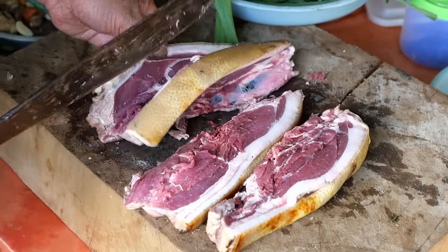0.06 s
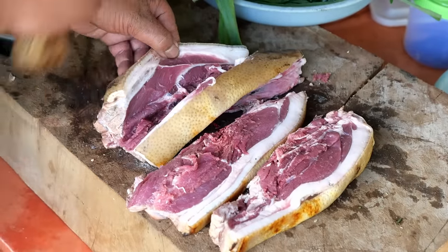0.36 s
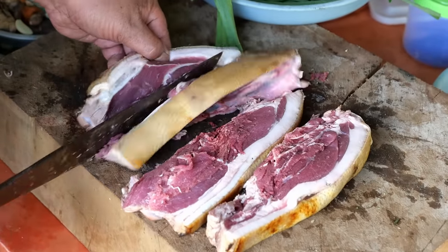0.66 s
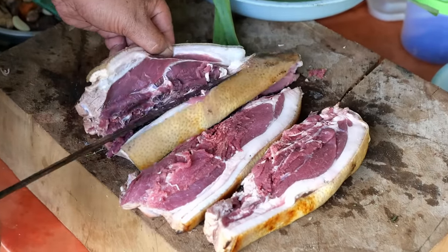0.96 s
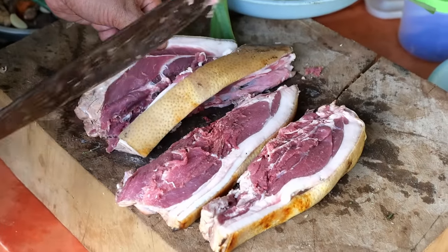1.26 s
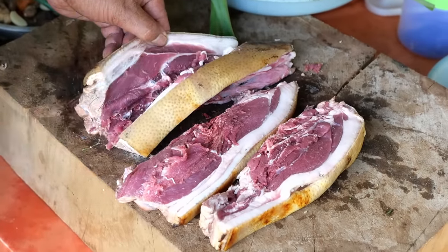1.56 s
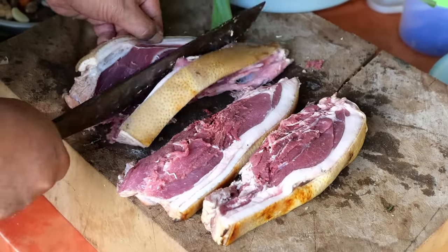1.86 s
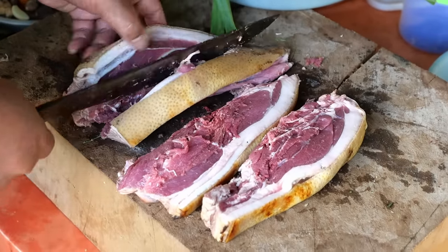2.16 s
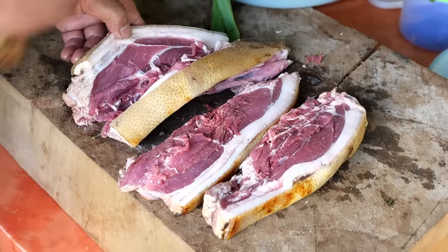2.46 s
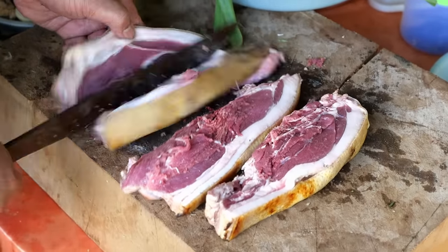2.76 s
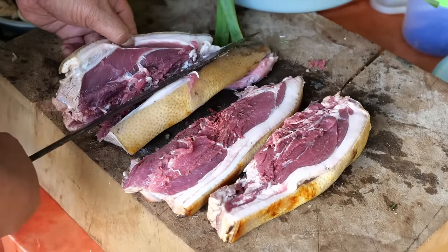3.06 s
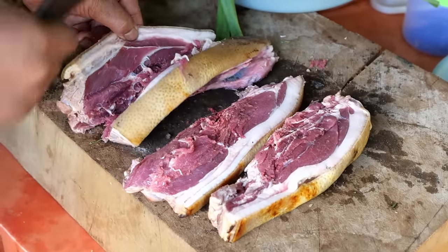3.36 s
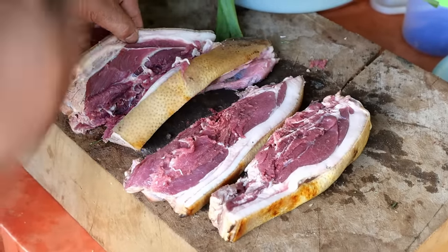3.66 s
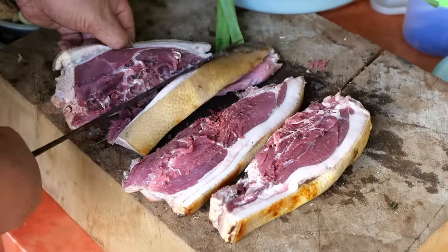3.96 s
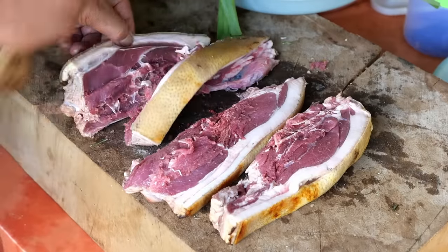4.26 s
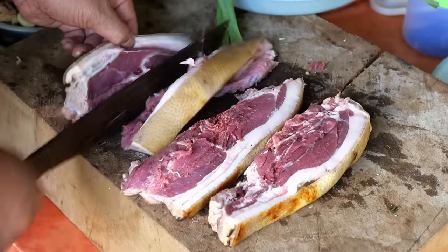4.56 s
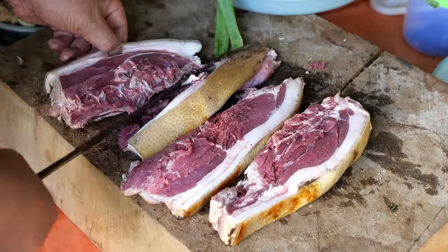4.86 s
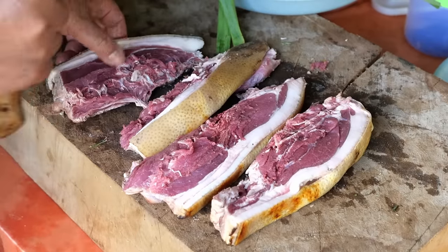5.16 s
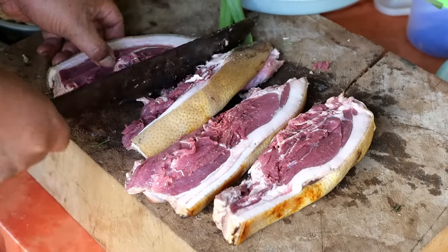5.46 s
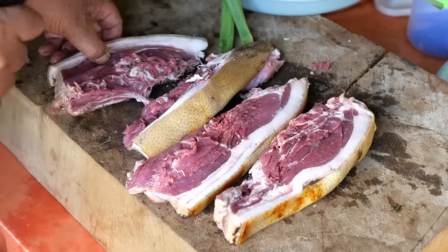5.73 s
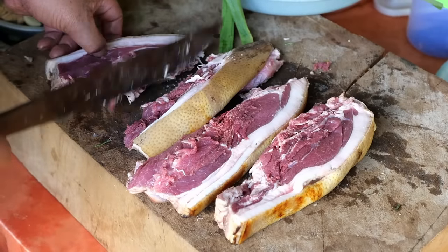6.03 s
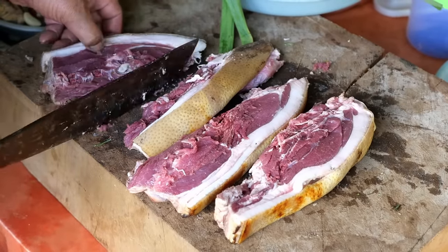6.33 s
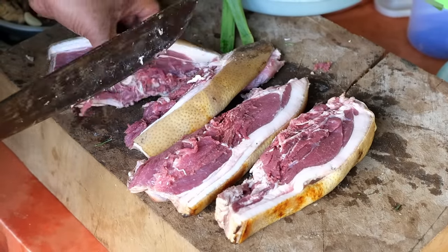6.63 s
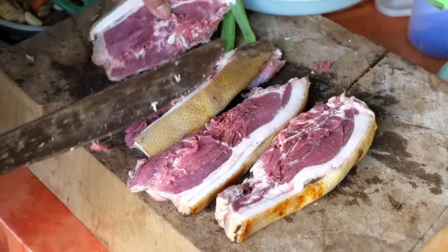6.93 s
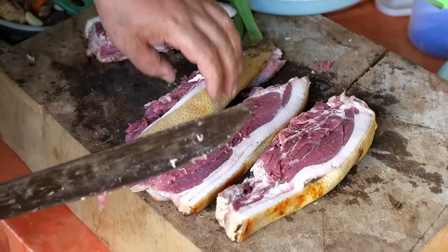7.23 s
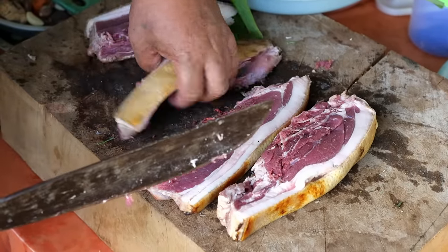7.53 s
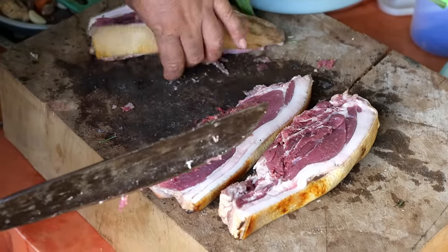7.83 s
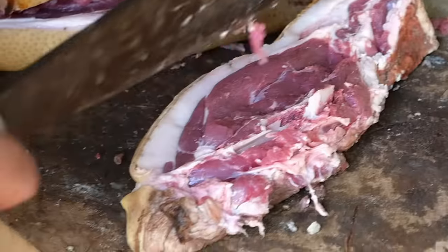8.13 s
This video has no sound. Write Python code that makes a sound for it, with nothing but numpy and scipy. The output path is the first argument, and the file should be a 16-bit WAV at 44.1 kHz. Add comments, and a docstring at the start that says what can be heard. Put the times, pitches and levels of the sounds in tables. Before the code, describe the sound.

Soft open-air hiss runs throughout, with a faint, low motor drone that sinks after the first half second and is gone by about 6 seconds. Close by, a heavy knife chops pork on a thick wooden block at about 0.6, 1.7, 2.8, 3.7 and 4.6 seconds. Each blow combines a crunch of bone, a very brief steel ring and a wooden thud, followed by a short echo from the walls. Three quicker, duller chops with much less crunch land at 5.4, 5.9 and 6.3 seconds. Between blows the blade rasps quietly in the cut and sinew snaps, and the steel clinks free of bone near 0.9 and 4 seconds. From about 7 seconds the work turns quiet: wet slabs are peeled up, slid and laid aside with small sticky squelches, and light bumps on the block near 7 and 8.2 seconds.

```python
"""Open air hisses and a far motor drones, sinking away, around a thick wooden block under a kitchen roof.
From 0.6 s a heavy knife chops pork eight times, quicker and softer at the end: bone crunches, the blade
rings briefly, the block thuds, the walls echo. Between chops the blade rasps in the cut, sinew snaps,
steel clinks free of bone, and meat bumps and squelches. From about 7 s wet slabs are peeled up
and laid aside."""
import sys
import numpy as np
from scipy import signal
from scipy.fft import rfft, irfft, next_fast_len
from scipy.io import wavfile
from scipy.ndimage import uniform_filter1d, minimum_filter1d

SR = 44100
rng = np.random.default_rng(int(sys.argv[2]) if len(sys.argv) > 2 else 0)


def put_to_file(sound):
    """Save the sound as 16-bit audio at rate SR, in the file named by the first command-line argument."""
    columns = np.atleast_2d(sound).T  # one column per channel
    safe = np.clip(columns, -1, 1)
    whole_steps = np.round(safe * 32767)
    wavfile.write(sys.argv[1], SR, whole_steps.astype(np.int16))


N = 369996


def amp(db):
    """Decibels to gain."""
    return 10 ** (np.asarray(db) / 20)


def unit_rms(x):
    """Scales to rms 1."""
    return x / np.sqrt(np.mean(x ** 2) + 1e-20)


def at_hz(points, hz):
    """Reads a table on a log-frequency axis."""
    points_hz, values = np.transpose(points)
    return np.interp(np.log(hz + 1), np.log(points_hz + 1), values)


def add(mix, start_s, sound):
    """Mixes a sound in place."""
    part = mix[max(round(start_s * SR), 0):][:len(sound)]
    part += sound[:len(part)]


def shelf_db(hz, treble_db):
    """Treble shelf, flat below 2 kHz."""
    return at_hz([(2000, 0), (4200, treble_db)], hz)


def colour(x, spectrum, treble_db=0, size=4096):
    """Minimum-phase filter of unit energy with the given spectrum and treble shelf."""
    hz = np.fft.rfftfreq(size, 1 / SR)
    log_gain = np.log(amp(at_hz(spectrum, hz) + shelf_db(hz, treble_db)))
    log_response = np.conj(signal.hilbert(np.r_[log_gain, log_gain[-2:0:-1]]))
    taps = np.fft.ifft(np.exp(log_response)).real
    return signal.fftconvolve(x, taps / np.linalg.norm(taps))[:len(x)]


def equalise(x, gains_db):
    """Zero-phase filter from a table of gains."""
    size = next_fast_len(len(x) + 4096)
    gain = amp(at_hz(gains_db, np.fft.rfftfreq(size, 1 / SR)))
    return irfft(rfft(x, size) * gain, size)[:len(x)]


# Air spectra, mid and side. Each row: frequency in Hz, relative density in dB.
AIR_MID_SPECTRUM = [(15, -77.5), (25, -34), (127, -0.5), (212, 2), (335, -8.5), (363, -1), (463, -12),
                    (516, -8), (659, -11), (863, -12.5), (2760, -16), (4370, -22), (9840, -30.5),
                    (14800, -36.5), (16000, -43.5)]
AIR_SIDE_SPECTRUM = [(15, -65), (25, -37.5), (200, -3.5), (263, -15), (373, -5.5), (463, -19), (575, -11.5),
                     (2690, -25.5), (4370, -32.5), (13200, -43.5), (16000, -40)]
# Hiss envelope. Each row: time in seconds, relative level in dB.
AIR_LEVEL_DB = [(0, -45.5), (4.5, -46), (5.05, -49.5), (5.298, -46.5), (5.8, -49.5), (6.6, -50.5),
                (7.2, -47.5), (8.39, -45)]


def open_air(gain_db=-3.0, side_db=-2):
    """Hiss from all sides; the level dips during the last quick chops."""
    mid = unit_rms(colour(rng.standard_normal(N), AIR_MID_SPECTRUM))
    side = amp(side_db) * unit_rms(colour(rng.standard_normal(N), AIR_SIDE_SPECTRUM))
    level_db = np.interp(np.arange(N) / SR, *np.transpose(AIR_LEVEL_DB)) + gain_db
    return np.array([mid + side, mid - side]) * amp(level_db)


def drift():
    """Slow random wander of rms 1."""
    return unit_rms(uniform_filter1d(uniform_filter1d(rng.standard_normal(N), size=2500), size=2500))


# Motor envelope. Each row: time in seconds, level in dB.
MOTOR_LEVEL_DB = [(0, -47), (.55, -47.5), (1.2, -63), (2.7, -55), (5.8, -74)]


def far_motor(tone_hz=182, wander_hz=7, throb_db=2.5):
    """One low tone, a little unsteady in speed and strength."""
    cycles = np.cumsum(tone_hz + wander_hz * drift()) / SR
    level_db = np.interp(np.arange(N) / SR, *np.transpose(MOTOR_LEVEL_DB)) + throb_db * drift()
    return amp(level_db) * unit_rms(np.sin(2 * np.pi * cycles))


def fracture(swell_s, size=8192):
    """Tiny snaps merge into a noise burst that peaks at swell_s and dies."""
    age = np.arange(size) / SR / max(swell_s, 1 / SR)
    return age * np.exp(1 - age) * rng.standard_normal(size)


# Breaking bone. Each row: frequency in Hz, relative density in dB.
CRUNCH_SPECTRUM = [(60, -21), (300, 4), (900, -4.5), (1600, -7), (2400, -4.5), (4000, -6), (6500, -10),
                   (10000, -16), (13000, -21.5), (16000, -26.5)]


def crunch(force, treble_db):
    """Tissue breaks under a force; hard bone gives the top octaves, soft meat swallows them."""
    return colour(force, CRUNCH_SPECTRUM, treble_db)


def ring(modes, detune, length_s=.4):
    """Decaying sines; each blow lands elsewhere and shifts them a little."""
    hz, db, t60_s = np.transpose(modes)[:, :, None]
    t = np.arange(int(length_s * SR)) / SR
    hz = hz * (1 + detune * rng.standard_normal(hz.shape))
    sign = (-1) ** np.arange(len(hz))[:, None]
    return (sign * amp(db - 60 * t / t60_s) * np.sin(2 * np.pi * hz * t)).sum(0)


# Free blade. Each row: frequency in Hz, relative level in dB, T60 in seconds.
BLADE_MODES = [(2005, 5.5, 0.033), (2420, 6.5, 0.034), (2590, 6.5, 0.038), (3323.4, 3.5, 0.045),
               (4154, -2, 0.043), (5180, -5, 0.031), (6865, -11, 0.098), (7880, -2, 0.0082),
               (10230, -3, 0.024)]


def blade(force, treble_db, t60_scale=1):
    """Steel rings under a force; meat on its sides shortens the ring by t60_scale."""
    modes = [(hz, db + shelf_db(hz, treble_db), t60_s * t60_scale) for hz, db, t60_s in BLADE_MODES]
    steel = ring(modes, detune=0.039)
    return signal.fftconvolve(force, steel / np.linalg.norm(steel))[:len(force)]


# Block and stand. Each row: frequency in Hz, relative level in dB, T60 in seconds.
BLOCK_MODES = [(91, -11.5, 0.14), (144.93, -3, 0.31), (238, -13.5, 0.053), (320.6, -3, 0.095),
               (330.3, 0, 0.089), (378.3, -5, 0.12), (405.5, -6.5, 0.057), (562, -7, 0.039),
               (691, -1, 0.023), (747, 3.5, 0.025), (907.5, -2, 0.025), (1018, -9, 0.045),
               (1229, -12, 0.066), (1389, -11.5, 0.056)]


def block(thump_db, body_db, knock_db):
    """Wood rings; where and how squarely it is hit weights the low, middle and high modes."""
    weights_db = [(145, thump_db), (250, body_db), (400, body_db), (750, knock_db)]
    return ring([(hz, db + at_hz(weights_db, hz), t60_s) for hz, db, t60_s in BLOCK_MODES], detune=.02)


# Knife blows. Each row: start in seconds, then crunch, block body, block knock, echo treble in dB.
KNIFE_BLOWS = [(0.6226, 6.5, -15, -2, 0.5), (1.7081, 4, -7, -4, -4), (2.761, 1.5, -14, -6.5, -1.5),
               (3.7167, 3, -3.5, -3.5, -7), (4.5876, 4.5, -1.5, 2, -7.5), (5.3691, -7, -9, -1.5, -16.5),
               (5.9217, -8.5, -.5, -2, -15), (6.2609, -13, -3, -5.5, -16.5)]


def chops(bone_db=-3, steel_db=-4, swell_s=.0018, block_delay_s=.0017577):
    """Bone gives way, the blade rings, the edge lands in the block; returns direct sound and echo send."""
    direct, send = np.zeros((2, N))
    for start_s, crunch_db, body_db, knock_db, echo_treble_db in KNIFE_BLOWS:
        # more bone: a brighter chop and a harder shove on the block
        treble_db = -3.5 + .82 * crunch_db
        thump_db = -13.5 + .58 * crunch_db
        force = amp(crunch_db) * fracture(swell_s)
        bone = crunch(force, treble_db)
        steel = blade(amp(crunch_db) * fracture(swell_s), treble_db, t60_scale=.3)
        wood = block(thump_db, body_db, knock_db)
        add(direct, start_s, amp(bone_db) * bone + amp(steel_db) * steel)
        add(direct, start_s + block_delay_s, wood)
        # the walls gather the crunch from all directions: one click of the same energy
        click = np.linalg.norm(force) * signal.unit_impulse(len(force))
        add(send, start_s + swell_s, amp(.26 - .35 * crunch_db) * crunch(click, echo_treble_db))
        add(send, start_s + block_delay_s, amp(-3 + .15 * crunch_db) * wood)
    return direct, send


# Rubs. Each row: start and length in seconds, centre and width in Hz, level in dB.
RUBS = [(0.681, 0.28, 4050, 1490, -43.5), (1.604, .12, 2200, 1200, -52.5), (3.302, 0.15, 2330, 900, -48.5),
        (5.174, .12, 2550, 450, -55.5), (6.96, 0.092, 1100, 700, -47), (7.24, 0.1098, 2930, 450, -59.5)]


def scrapes():
    """The blade rasps in the cut, meat slides on wood: friction noise in one resonance."""
    out = np.zeros(N)
    for start_s, length_s, hz, width_hz, db in RUBS:
        size = int(length_s * SR)
        rub = signal.lfilter(*signal.iirpeak(hz, hz / width_hz, SR), rng.standard_normal(size))
        add(out, start_s, amp(db) * unit_rms(rub) * signal.windows.hann(size))
    return out


# Small breaks. Each row: start in seconds, level in dB, treble in dB, swell in seconds.
SINEW_SNAPS = [(.876, -33.5, -6.5, 0.001554), (2.001, -42.5, -1, 0.009873), (3.1761, -46, -7.5, 0.0044),
               (4.009, -24.5, 4, 0.00046), (4.0155, -37, 5.5, 0.001573), (6.253, -27.5, -3, .002),
               (7.941, -40, 20, .0014)]


def snaps():
    """Sinew and splinters break in small crunches."""
    out = np.zeros(N)
    for start_s, db, treble_db, swell_s in SINEW_SNAPS:
        add(out, start_s, amp(db) * crunch(fracture(swell_s), treble_db))
    return out


# Steel on bone. Each row: start in seconds, level in dB, treble in dB, contact time in seconds.
BLADE_CLINKS = [(0.919, -27, 5, 0.00081), (3.977, -31, 5, 0.0023), (3.988, -34, 15, 0.002944)]


def clinks():
    """The blade strikes bone as it comes free and rings undamped by meat."""
    out = np.zeros(N)
    for start_s, db, treble_db, contact_s in BLADE_CLINKS:
        add(out, start_s, amp(db) * blade(fracture(contact_s), treble_db))
    return out


# Light hits. Each row: start in seconds, thud in dB, knock in dB.
BLOCK_BUMPS = [(0.9198, -48, -32.5), (3.189, -44, -33), (6.949, -40, -35), (6.987, -35, -25.5),
               (8.207, -42.5, -36.5)]


def bumps():
    """Meat and knife bump the block and ring it faintly."""
    out = np.zeros(N)
    for start_s, thud_db, knock_db in BLOCK_BUMPS:
        add(out, start_s, block(thud_db, thud_db, knock_db))
    return out


# Juice pops. Each row: frequency in Hz, relative density in dB.
JUICE_SPECTRUM = [(100, -11.5), (700, 2.5), (2500, 3), (5000, -3.5), (10000, -3.5), (16000, -15.5)]
# Peeling meat. Each row: start in seconds, swell in seconds, level in dB.
MEAT_PEELS = [(1.045, 0.03872, -56.5), (3.675, 0.093, -46), (4.013, 0.0059, -36), (6.862, 0.015, -50.5),
              (6.954, .038, -52), (7.095, 0.017, -47.5), (7.45, 0.026, -56), (7.572, 0.013805, -50.5),
              (7.721, 0.014, -50.5), (7.9, 0.11, -54.5), (8.23, 0.03854, -49), (8.335, 0.019, -46.5)]


def squelches(pops_per_s=7000, pop_spread_db=1.5):
    """Wet meat sticks and peels: films of juice break in a swarm of tiny pops that swells and fades."""
    out, size = np.zeros(N), SR // 2
    for start_s, swell_s, db in MEAT_PEELS:
        strengths = amp(pop_spread_db * np.minimum(rng.exponential(1, size), 4))
        pops = rng.standard_normal(size) * strengths * (rng.random(size) < pops_per_s / SR)
        age = np.arange(size) / SR / swell_s
        add(out, start_s, amp(db) * unit_rms(colour(pops, JUICE_SPECTRUM)) * age * np.exp(1 - age))
    return out


# Echo decay. Each row: frequency in Hz, T60 in seconds.
WALL_T60_S = [(120, 0.93), (400, 0.55), (1000, 0.62), (4000, 0.51), (9000, 0.48), (15000, 0.04)]
# Echo spectrum. Each row: frequency in Hz, relative level in dB.
WALL_LEVEL_DB = [(100, -10), (190, -7), (350, -3.5), (900, -6.5), (2500, -11.5), (4500, -10), (7000, -14),
                 (14000, -14)]


def walls(x, echoes_per_s=6000, build_s=.00062, early_db=4, early_s=.035, tail_cut_s=.38):
    """Dense echoes, strongest off near surfaces, die band by band."""
    t = np.arange(SR) / SR
    echoes = unit_rms(rng.choice([-1., 1.], SR) * (rng.random(SR) < echoes_per_s / SR))
    echoes *= 1 - np.exp(-t / build_s)
    # the tail falls away faster after about 0.3 s, as if cut by noise suppression
    echoes *= amp(early_db * np.exp(-t / early_s) - 2 * (t / tail_cut_s) ** 4)
    hz, frame_s, bands = signal.stft(echoes, SR, nperseg=512)
    t60_s = at_hz(WALL_T60_S, hz)[:, None]
    bands *= amp(at_hz(WALL_LEVEL_DB, hz)[:, None] - 60 * frame_s / t60_s)
    bands *= np.sqrt(np.log(1e6) / t60_s / SR)  # normalises each decay's energy
    return signal.fftconvolve(x, signal.istft(bands, SR, nperseg=512)[1])[:N]


# Mismatch of the two microphone ports. Each row: frequency in Hz, side gain in dB.
PORT_SIDE_DB = [(150, -15), (400, -15), (600, -12.5), (1400, -11), (3000, -11.5), (7000, -11), (13000, -6)]


def scene(handling_echo_db=-2, meat_echo_db=7, bounce_db=-1, echo_side_db=1, bounce_s=.0012):
    """Work on the block, with echoes, over air and motor; the work shifts slightly left near 5 s."""
    blows, send = chops()
    handling = bumps() + clinks() + snaps() + scrapes()
    meat = squelches()
    direct = blows + handling + meat
    send = send + amp(handling_echo_db) * handling + amp(meat_echo_db) * meat
    mid = direct + walls(send)
    bounce = np.zeros(N)  # off the block, reaching the two ports unevenly
    add(bounce, bounce_s, amp(bounce_db) * direct)
    side = equalise(bounce + amp(echo_side_db) * walls(send), PORT_SIDE_DB)
    pan_db = np.interp(np.arange(N) / SR, [4.8, 5.3], [-.5, .9])
    work = np.array([mid + side, mid - side]) * amp(np.array([pan_db, -pan_db]) / 2)
    return work + open_air() + far_motor()


def record(dry, notch_hz=480, notch_q=5, ceiling_db=2, recovery_db_per_s=35, cutoff_hz=15900):
    """Microphone notch, limiter that ducks after loud chops, soft clip, low-pass."""
    x = signal.lfilter(*signal.iirnotch(notch_hz, notch_q, SR), dry)
    peak_db = 20 * np.log10(abs(x).max(0) + 1e-9)
    over_db = np.maximum(peak_db - ceiling_db, 0)
    ramp_db = np.arange(N) * recovery_db_per_s / SR
    duck_db = np.maximum.accumulate(over_db + ramp_db) - ramp_db
    x = x * amp(uniform_filter1d(minimum_filter1d(-duck_db, size=65), size=65))
    x = x / (1 + x ** 6) ** (1 / 6)
    lowpass = signal.firwin(255, cutoff_hz, window=("kaiser", 9), fs=SR)
    return signal.oaconvolve(x, lowpass[None], "same")


dry = scene()
out = record(dry)
put_to_file(out)
```